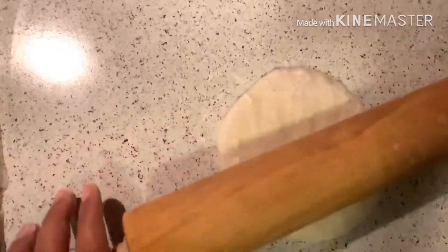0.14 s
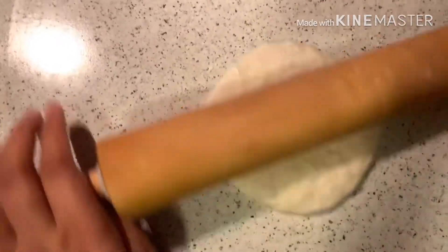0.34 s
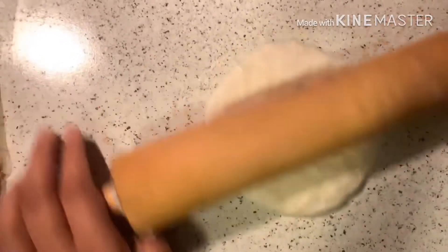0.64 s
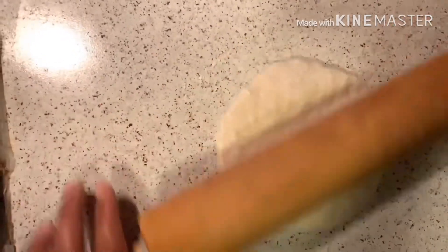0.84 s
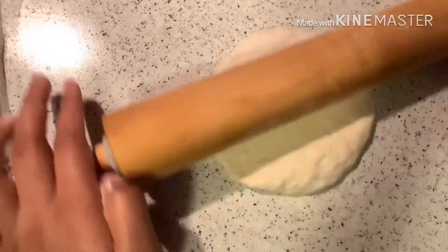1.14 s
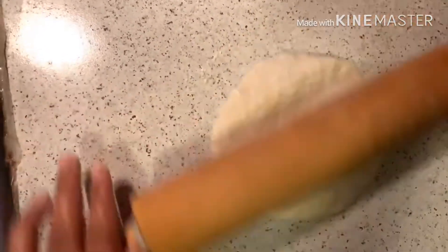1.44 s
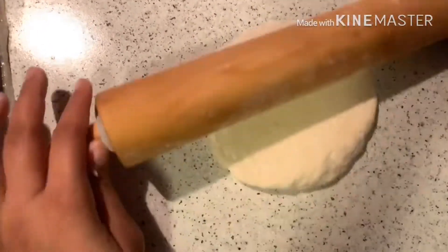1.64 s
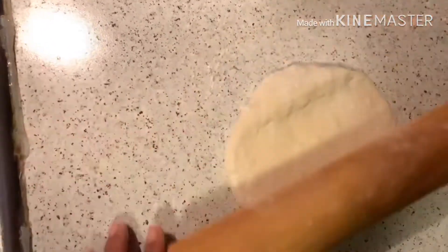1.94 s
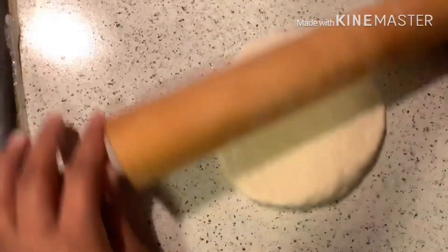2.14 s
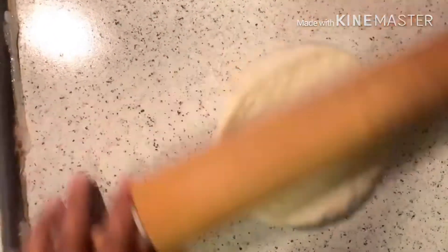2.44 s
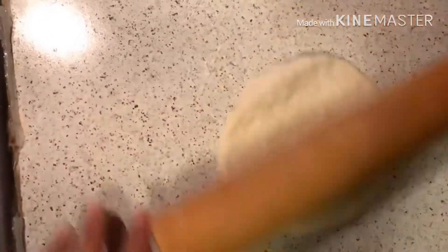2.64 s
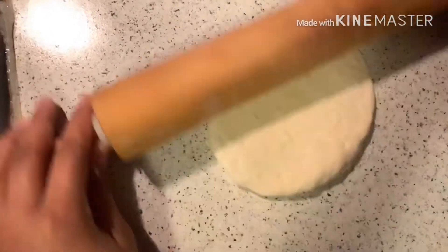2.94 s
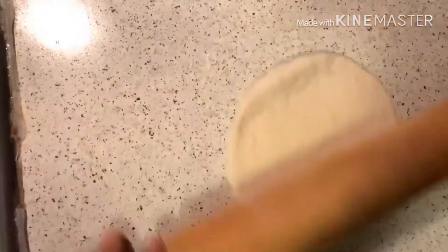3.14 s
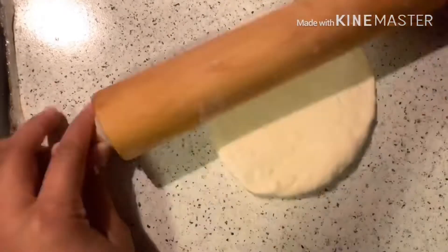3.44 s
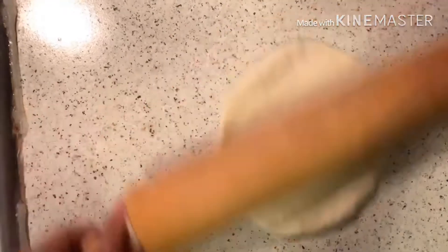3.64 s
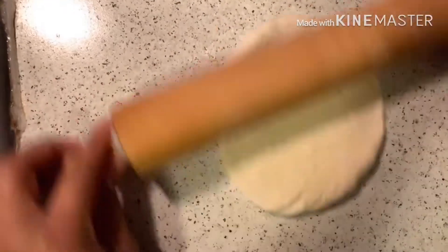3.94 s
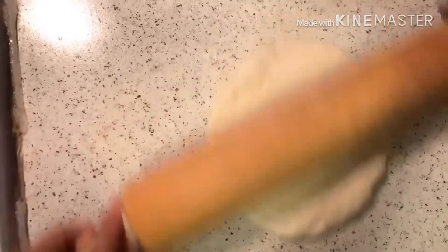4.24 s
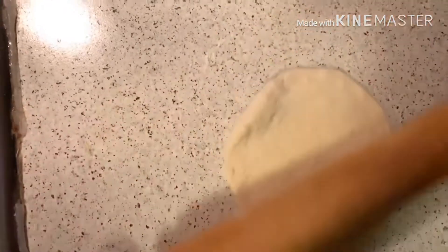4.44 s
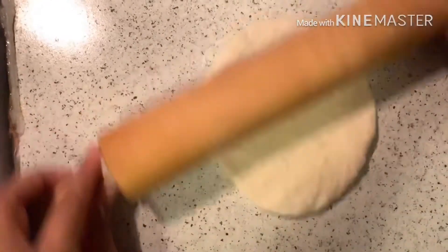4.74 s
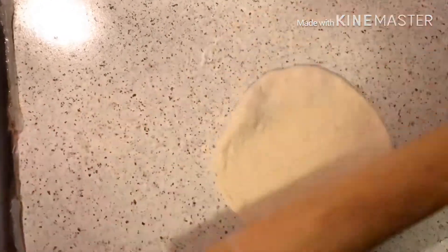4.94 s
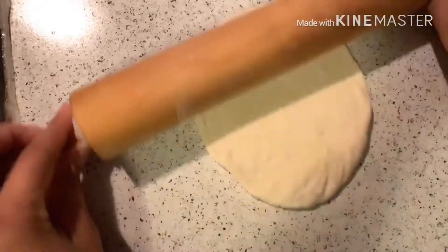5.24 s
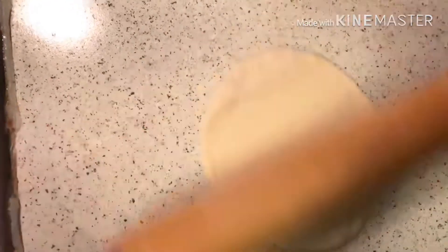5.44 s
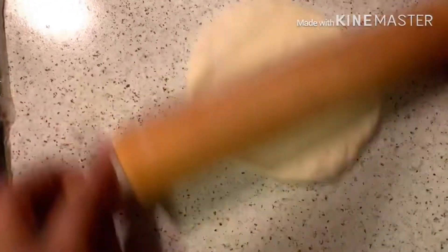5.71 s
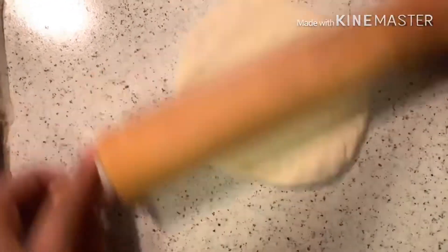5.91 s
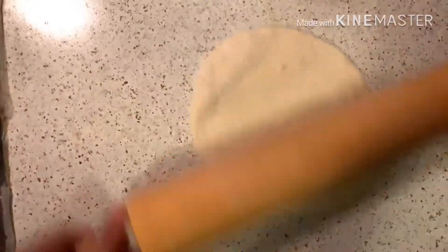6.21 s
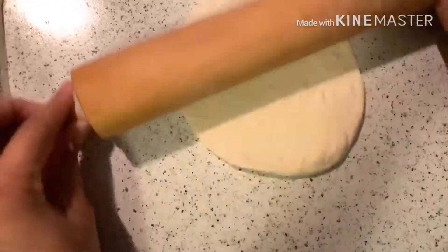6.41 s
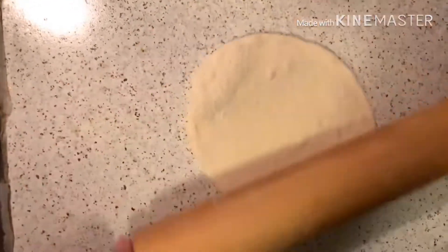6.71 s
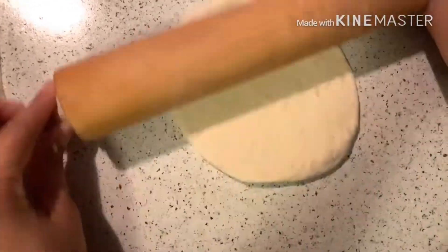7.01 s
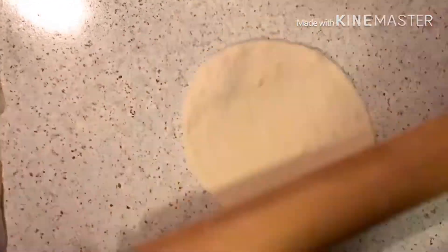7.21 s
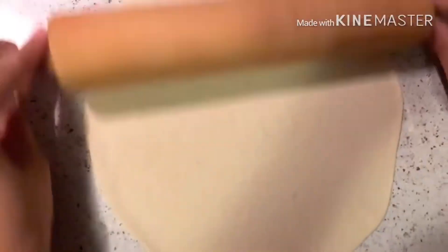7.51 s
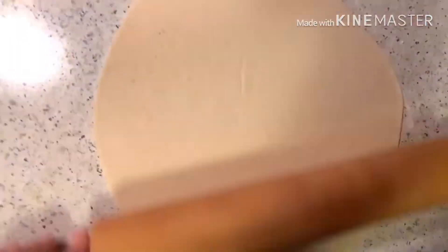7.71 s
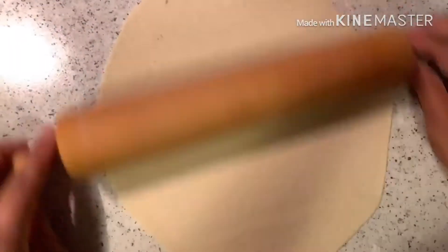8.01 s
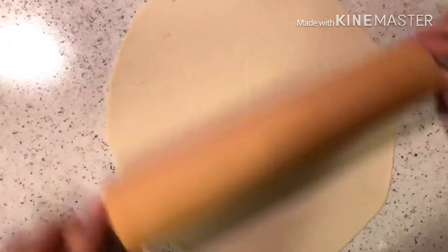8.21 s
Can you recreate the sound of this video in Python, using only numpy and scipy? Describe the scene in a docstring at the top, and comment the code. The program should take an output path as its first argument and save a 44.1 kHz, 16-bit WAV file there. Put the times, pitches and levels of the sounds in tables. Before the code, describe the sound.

Quick alternating rubbing of a rolling pin on dough, quiet at first, growing stronger and then easing. The loose axle sings in narrow, breathy squeaks and ticks now and then. After an opening tap, a loud double wooden clack and a later hard thud stand out, with brief rod scrapes. Last strokes are longer and smeared together. Small, slightly reverberant kitchen, faint steady hum, close single-point sound.

```python
"""A small kitchen with a stone counter, a mono microphone close to the work.
A wooden rolling pin runs to and fro over dough: shaped noise swells with each stroke's speed,
and the axle sings in it as noise through narrow resonances of wandering pitch.
Thuds and wooden knocks are sums of decaying modes; ticks and slides along the rod are shaped noise.
An appliance hums as sine lines over still air, and swelling sines make soft low booms."""
import sys
import numpy as np
from scipy import signal
from scipy.fft import rfft, irfft
from scipy.io import wavfile
from scipy.ndimage import map_coordinates

SR = 44100
rng = np.random.default_rng(int(sys.argv[2]) if len(sys.argv) > 2 else 0)


def dump(signal):
    """Clip the signal to [-1, 1] and save it as 16-bit WAV at the path in sys.argv[1]."""
    limited = np.clip(np.atleast_2d(signal).T, -1, 1)
    pcm = np.round(limited * 32767).astype(np.int16)
    wavfile.write(sys.argv[1], SR, pcm)


N = 368676
TIME = np.arange(N) / SR


def undb(db):
    """Decibels to gain."""
    return 10 ** (np.asarray(db) / 20)


def unit(x):
    """Scale to rms 1."""
    return x / np.sqrt(np.mean(x ** 2))


def colour(x, points):
    """Shape a sound's spectrum by (frequency [Hz], level [dB]) points; rms 1."""
    hz, db = np.transpose(points)
    f = np.maximum(np.fft.rfftfreq(len(x), 1 / SR), 1)
    gain = undb(np.interp(np.log(f), np.log(hz), db))
    return unit(irfft(rfft(x) * gain, len(x)))


def resonate(x, hz, width_hz):
    """One resonance, gain 1 at its centre."""
    b, a = signal.iirpeak(hz, hz / width_hz, fs=SR)
    return signal.lfilter(b, a, x)


def butter(x, hz, kind, order=2):
    """Smooth low-, high- or band-pass."""
    sos = signal.butter(order, hz, kind, fs=SR, output="sos")
    return signal.sosfilt(sos, x)


def walk(rate):
    """Slow chance with rms 1: random levels, rate per second, joined by straight lines."""
    knots = np.arange(0, N / SR + 1, 1 / rate)
    return unit(np.interp(TIME, knots, rng.standard_normal(len(knots))))


def grains(spread_db):
    """Dense tiny slips: noise whose level is redrawn every 16 samples."""
    sizes = np.repeat(rng.standard_normal(N // 16 + 1), 16)[:N]
    return unit(rng.standard_normal(N) * undb(spread_db * sizes))


def fade(t, t60):
    """Exponential decay, 60 dB down after t60 seconds."""
    return np.exp(-np.log(1000) * t / t60)


def ring(modes):
    """A struck body's free ringing: a sum of decaying sines."""
    t = TIME[:SR // 2]
    return sum(undb(db) * fade(t, t60) * np.sin(2 * np.pi * hz * t) for hz, db, t60 in modes)


def add(track, s, sound, db):
    """Place a sound at a time with a peak level."""
    i = max(int(s * SR), 0)
    track[i:i + len(sound)] += (undb(db) * sound / np.abs(sound).max())[:N - i]


def swell(s, length, db):
    """A rounded rise and fall, reaching its level halfway."""
    progress = np.clip((TIME - s) / length, 0, 1)
    return undb(db) * 2 * np.sqrt(progress * (1 - progress))


HUM_HZ, MAINS_HZ = 98.7, 99.98
HUM_DB, MAINS_DB = -49.1, -60.3
BEAT_CREST_S = .67  # a moment when the two hums swell together
# lines of the motor's hum: (multiple of the hum frequency, relative level [dB])
MOTOR_LINES = [(.5, -13), (1, 4), (2.5, -15.5), (3, -24)]
# spectrum of the kitchen's still air: (frequency [Hz], relative level [dB])
STILL_AIR = [(30, -40), (48, 2), (80, 2), (120, -4), (170, -18), (255, -6), (400, -22), (1000, -19.5),
             (3000, -26), (8000, -53), (16000, -50.5)]


def kitchen(waver_db=.6):
    """A motor's wavering hum beats slowly against the mains hum, over still air."""
    since_crest = TIME - BEAT_CREST_S
    phase = 2 * np.pi * HUM_HZ * since_crest + .08 * walk(6)
    motor = unit(sum(undb(db) * np.sin(k * phase) for k, db in MOTOR_LINES))
    mains = unit(np.sin(2 * np.pi * MAINS_HZ * since_crest))
    air = colour(rng.standard_normal(N), STILL_AIR) * undb(-59.6 + 0.32 * walk(6.6))
    return motor * undb(HUM_DB + waver_db * walk(8)) + mains * undb(MAINS_DB) + air


# moments when the pin turns round, a pull first, then push and pull by turns: (time [s])
TURN_TIMES = [-.07, .28, .618, .927, 1.22, 1.494, 1.793, 2.084, 2.404, 2.703, 3.019, 3.337, 3.62, 3.895,
              4.186, 4.477, 4.752, 5.062, 5.345, 5.635, 5.917, 6.208, 6.484, 6.782, 7.073, 7.452, 7.902,
              8.18, 8.45]
# every pull, and every push: (moment of full speed [fraction of stroke], rubbing [dB], axle ring [dB])
PULL_STROKE = (.56, -.1, -1.5)
PUSH_STROKE = (.48, .1, -3)
# how hard the hands bear down: (time [s], base level of the rolling [dB])
HAND_PRESSURE = [(.1, -58.5), (.45, -53.2), (1.1, -52.2), (1.65, -52.3), (2.3, -49.7), (3.15, -49.8),
                 (3.75, -47.6), (4.35, -46.7), (4.9, -48.7), (5.5, -45.7), (6.05, -47.2), (6.6, -51.9),
                 (6.95, -51.2), (7.17, -47.3), (7.42, -53.5), (7.75, -46.8), (8.05, -50.5), (8.3, -48.7)]
# how readily the axle sings, quiet at first: (time [s], relative gain [dB])
AXLE_READINESS = [(0, -7), (1.7, -1.5), (2.65, 2), (3.2, -2.5), (4.4, -2), (6.6, .5), (8.2, 2)]


def motion():
    """The pin speeds up and stops between turns; returns speed 0-1, pressure gain and axle gain."""
    strokes = [PUSH_STROKE if k % 2 else PULL_STROKE for k in range(len(TURN_TIMES) - 1)]
    fastest, rub_db, axle_db = np.transpose(strokes)
    middle = TURN_TIMES[:-1] + fastest * np.diff(TURN_TIMES)
    # each mark is a quarter cycle: stop, full speed, stop
    marks = np.sort(np.append(TURN_TIMES, middle))
    quarters = np.interp(TIME, marks, np.arange(len(marks)))
    speed = np.abs(np.sin(np.pi / 2 * quarters))
    pressure_db = np.interp(TIME, *np.transpose(HAND_PRESSURE)) + np.interp(TIME, middle, rub_db)
    ring_db = np.interp(TIME, *np.transpose(AXLE_READINESS)) + np.interp(TIME, middle, axle_db)
    return speed, undb(pressure_db), undb(ring_db)


WIDE_SHEET_S = 7.4  # from here on the dough is a wide, thin sheet
# rubbing on the small round of dough, then on the wide sheet: (frequency [Hz], relative level [dB])
ROUND_SPECTRUM = [(150, -5), (400, -13), (700, -6.5), (1100, -4.5), (1600, -4.5), (2800, 0), (3400, -3),
                  (4500, -1), (5800, 0), (8000, -4.5), (11000, -7), (16000, -9)]
SHEET_SPECTRUM = [(150, 1.5), (500, -12), (1100, -11), (1700, -9.5), (2600, -1.5), (3400, -4.5),
                  (4500, -4.5), (5800, 3), (8000, -7), (11000, -12), (16000, -14)]


def rubbing(speed):
    """Fine friction of the turning pin: louder and brighter with speed, patchy where the wood is uneven."""
    slips = grains(spread_db=1.0)
    on_sheet = TIME > WIDE_SHEET_S
    rub = np.where(on_sheet, colour(slips, SHEET_SPECTRUM), colour(slips, ROUND_SPECTRUM))
    # on the wide sheet the pin swivels and drags more and more through its turns
    swivel = np.clip((TIME - WIDE_SHEET_S) / 2.4, 0, 1)
    speed = speed + swivel * (.8 - speed)
    # the contact moves, so different parts of the spectrum come and go
    bands_hz = np.geomspace(1000, 12000, 18)
    rub = rub + sum(.3 * walk(34) * resonate(rub, hz, hz / 10) for hz in bands_hz)
    dull = butter(rub, 3200, "low", order=1)
    bright = rub - dull
    moving = dull * (speed ** 1.02 + 0.051) + bright * (speed ** 1.72 + 0.0092)
    patches_db = 1.5 + 1.1 * walk(45)
    return moving * undb(patches_db)


# the axle's resonances: (frequency [Hz], nominal width [Hz], relative level [dB])
AXLE_MODES = [(2268, 93, 4.5), (2590, 31, -6.5), (4210, 160, 2.5), (5620, 240, -6)]


def axle(speed):
    """The dry axle sings in fits, even at low speed, its pitch wandering as it turns."""
    slips = rng.standard_normal(N)
    song = np.zeros(N)
    for hz, width, db in AXLE_MODES:
        # two passes narrow the resonance, so each starts wider
        tone = resonate(resonate(slips, hz, 1.3 * width), hz, 1.3 * width)
        fit_db = 3.5 * walk(28)
        song += undb(db + fit_db) * unit(tone)
    # reading the song a little early or late bends its pitch
    wander = np.cumsum(.018 * walk(22)) + np.arange(N)
    song = map_coordinates(song, [wander], order=3, mode="mirror")
    # silent at rest, soon near full strength once the pin turns
    turning = speed ** 2 / (speed ** 2 + 0.26)
    return song * turning * undb(-11.0)


# the barrel sliding along its rod: (start [s], length [s], level at the crest [dB])
ROD_SLIDES = [(0.043, 0.055, -49), (3.653, 0.076, -44.5), (5.358, 0.13, -42)]
# spectrum of the scrape: (frequency [Hz], relative level [dB])
SCRAPE_SPECTRUM = [(300, -38), (700, -2.5), (1100, -1), (1700, -1), (2300, -5), (3000, -2), (3800, 3.5),
                   (5000, -11), (6300, -4), (9000, -23), (16000, -19)]


def slides():
    """Wood scrapes along the rod as the barrel shifts sideways: shaped noise with a flickering level."""
    scrape = colour(grains(spread_db=0), SCRAPE_SPECTRUM)
    return scrape * sum(swell(*row) for row in ROD_SLIDES) * undb(1.5 * walk(160))


# wooden knocks: a faint ring laid under the two opening blows, then the handle knocking against the barrel's
# end: (time [s], peak level [dB])
WOODEN_KNOCKS = [(0.0589, -32), (.0835, -33), (3.582, -13.5), (5.357, -31), (5.721, -33), (6.944, -42)]
# modes of the woody ring, before filtering: (frequency [Hz], relative level [dB], t60 [s])
WOOD_MODES = [(565, -4, 0.033), (930, -14, 0.049), (1117, 7, 0.019), (1544, -0.5, 0.012),
              (1700, -5.5, 0.043), (2245, -3, 0.031), (2540, -17, 0.022), (3000, -8, 0.03),
              (3420, -5, 0.026), (5000, -13, .015), (6160, -8, 0.033)]


def clacks(crack_db=-2.5, crack_t60=0.047):
    """The ring of handle knocks, and a faint ring under the opening blows: decaying modes and a rough crack of
    noise."""
    out, t = np.zeros(N), TIME[:SR // 2]
    for s, db in WOODEN_KNOCKS:
        crack = unit(butter(rng.standard_normal(len(t)), [700, 3300], "band")) * fade(t, crack_t60)
        body = ring(WOOD_MODES) + undb(crack_db) * crack
        add(out, s, butter(butter(body, 720, "high"), 3700, "low"), db)
    return out


# the barrel meeting the counter: (time [s], peak level [dB], contact cut-off [Hz])
BARREL_BLOWS = [(.059, -35, 3000), (0.081, -29.5, 2400), (.535, -39.5, 420), (1.065, -39, 650),
                (1.678, -29, 600), (3.419, -15, 1120), (4.003, -44, 800), (4.591, -48, 714),
                (5.534, -27, 900), (5.691, -15, 1000), (7.416, -48.5, 400)]
# what barrel and slab ring with, before filtering: (frequency [Hz], relative level [dB], t60 [s])
SLAB_MODES = [(122, -12, .2), (293, -6.5, 0.05), (439, 1.5, 0.023), (519, -2.5, 0.069), (767, 5.5, 0.016),
              (1086, -0.5, 0.03), (1576, -4.5, 0.017), (2500, 0, .015)]


def thuds(spread_s=0.00354):
    """Blows on the slab; bending waves carry the highs ahead of the lows, so each chirps down."""
    out, body = np.zeros(N), ring(SLAB_MODES)
    f = np.fft.rfftfreq(len(body), 1 / SR)
    delay_s = spread_s / np.sqrt(1 + (f / 450) ** 2)
    # phase is the running sum of delay over frequency
    phase = 2 * np.pi * np.cumsum(delay_s) * f[1]
    body = irfft(rfft(body) * np.exp(-1j * phase), len(body))
    for s, db, contact_hz in BARREL_BLOWS:
        add(out, s, butter(butter(body, contact_hz, "low"), 194, "high"), db)
    return out


# sharp ticks: the bright crack of hard blows, and small ticks of the loose axle:
# (time [s], peak level [dB], centre [Hz])
SHARP_TICKS = [(.0592, -18.5, 5300), (.061, -27, 1500), (0.083, -24, 2000), (0.2688, -38, 12800),
               (1.067, -38.5, 4500), (2.743, -41, 2500), (5.6906, -26, 5470), (6.509, -44, 3980),
               (6.944, -30, 7100), (7.337, -39, 7000), (7.358, -39, 6000)]


def ticks(t60=0.021):
    """Short cracks of hard blows and of the loose axle: decaying noise through one broad resonance."""
    out, t = np.zeros(N), TIME[:SR // 10]
    for s, db, hz in SHARP_TICKS:
        burst = rng.standard_normal(len(t)) * fade(t, t60)
        add(out, s, resonate(burst, hz, width_hz=2300), db)
    return out


# soft low booms: the tail of the opening thud, then the counter under the rolling pin:
# (start [s], length [s], level at the crest [dB], mean pitch [Hz])
LOW_BOOMS = [(0.07, 0.1, -48, 226), (4.197, 0.23, -53, 120), (5.687, 0.093, -44.5, 75),
             (7.58, 0.29, -43.5, 102), (8.093, 0.046, -42.5, 100)]


def bumps(wobble=0.1083):
    """The opening thud's tail, then the counter under the rolling pin: swelling sines of unsteady pitch."""
    phase = 2 * np.pi * np.cumsum(1 + wobble * walk(110)) / SR
    return sum(swell(s, length, db) * np.sqrt(2) * np.sin(hz * phase) for s, length, db, hz in LOW_BOOMS)


# the kitchen's reverberation, in octave bands: (centre [Hz], t60 [s], relative level [dB])
REVERB_BANDS = [(129, 0.47, 2), (255, 0.36, -0.5), (526, .25, -2), (984, 0.22, 2.5), (2060, 0.2, -1.5),
                (4340, 0.38, -6), (8600, .2, 2)]


def room(x, wet_db, first_s):
    """Nearby cupboards and walls answer with a short diffuse tail of decaying noise bands."""
    t = TIME[:SR // 2]
    tail = np.zeros(len(t))
    for hz, t60, db in REVERB_BANDS:
        octave = [hz / np.sqrt(2), hz * np.sqrt(2)]
        band = butter(rng.standard_normal(len(t)), octave, "band")
        tail += undb(db) * fade(t, t60) * band
    # nothing before first_s, full after twice that
    tail = tail * np.clip(t / first_s - 1, 0, 1)
    return x + undb(wet_db) * signal.fftconvolve(x, tail)[:N]


# first echoes off the wall and cupboards: (delay [s], level [dB])
FIRST_ECHOES = [(.0165, -19), (0.031, -18)]


def echoes(x):
    """Dull first returns from the wall and cupboards: delayed, low-passed copies."""
    dull = butter(x, 2200, "low")
    return sum(undb(db) * np.pad(dull, (int(s * SR), 0))[:N] for s, db in FIRST_ECHOES)


def scene():
    """Rubbing and knocks in the kitchen, the same in both channels."""
    speed, pressure, axle_gain = motion()
    rolling = pressure * (rubbing(speed) + axle_gain * axle(speed)) + slides()
    knocks = clacks() + thuds() + ticks()
    rolling_in_room = room(rolling, wet_db=-37, first_s=0.0038)
    knocks_in_room = room(knocks, wet_db=-34, first_s=.005) + echoes(knocks)
    mono = kitchen() + rolling_in_room + knocks_in_room + bumps()
    return np.array([mono, mono])


TOP_HZ = 15800


def record(dry):
    """The recorder cuts the top with a steep low-pass."""
    top_cut = signal.ellip(10, .2, 70, TOP_HZ, fs=SR, output="sos")
    return signal.sosfilt(top_cut, dry)


dry = scene()
out = record(dry)
dump(out)
```